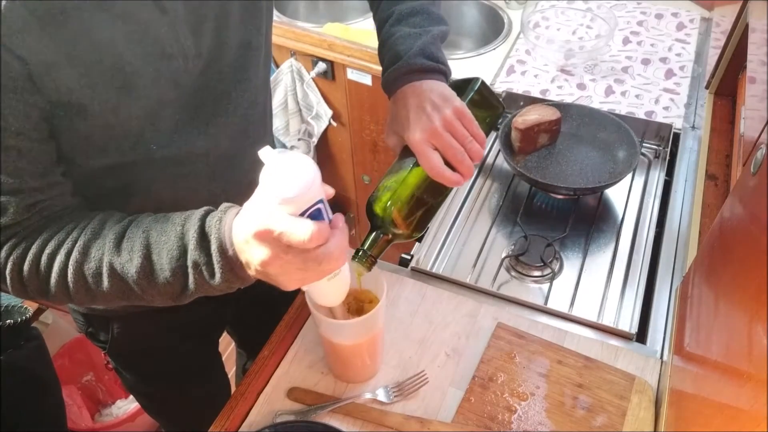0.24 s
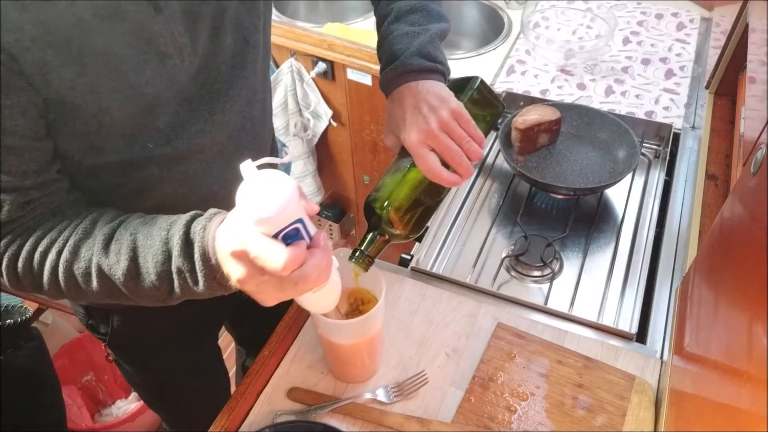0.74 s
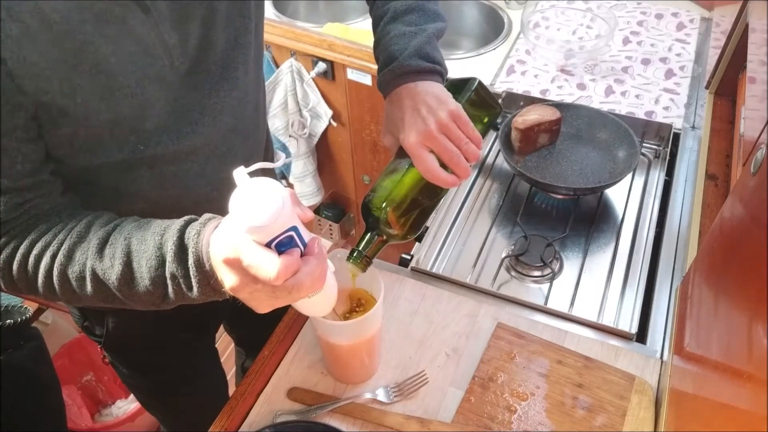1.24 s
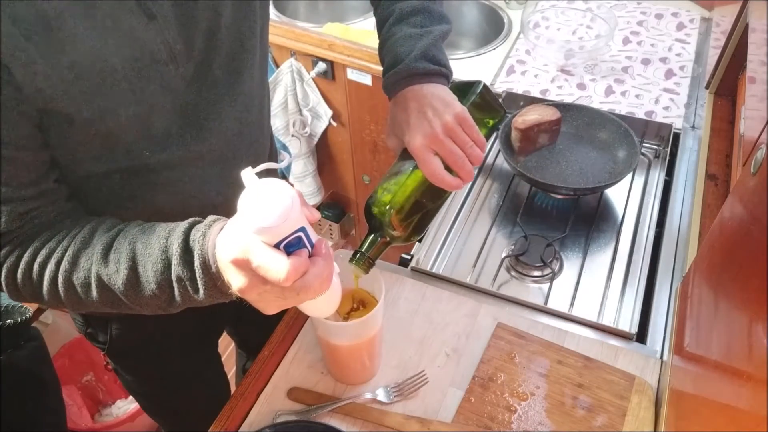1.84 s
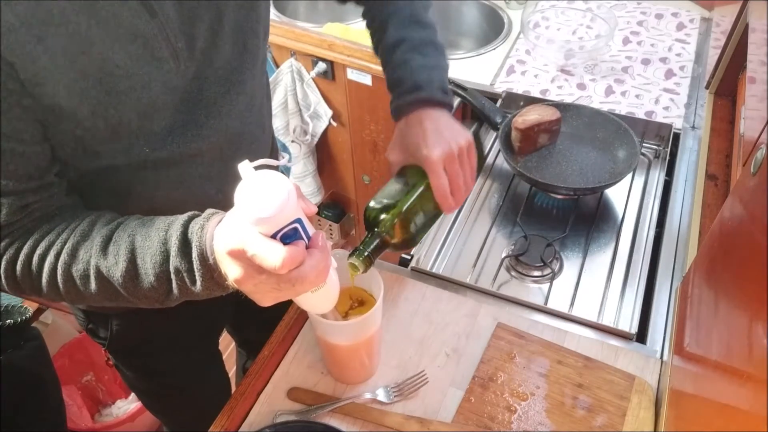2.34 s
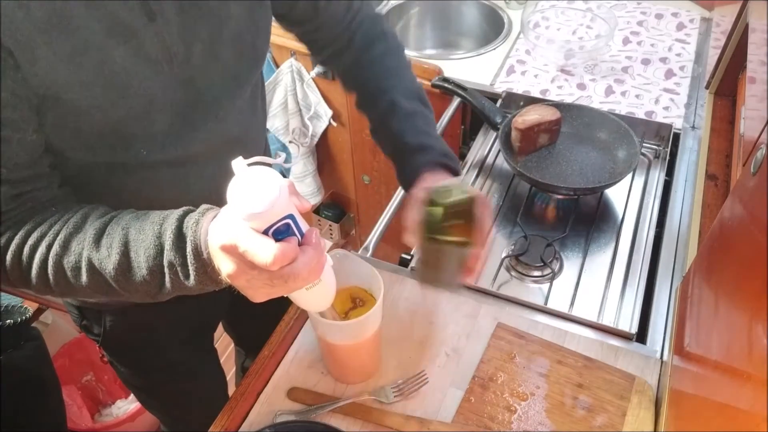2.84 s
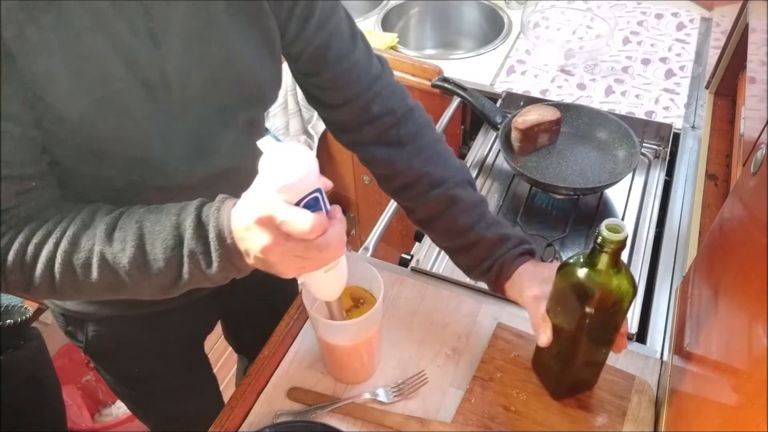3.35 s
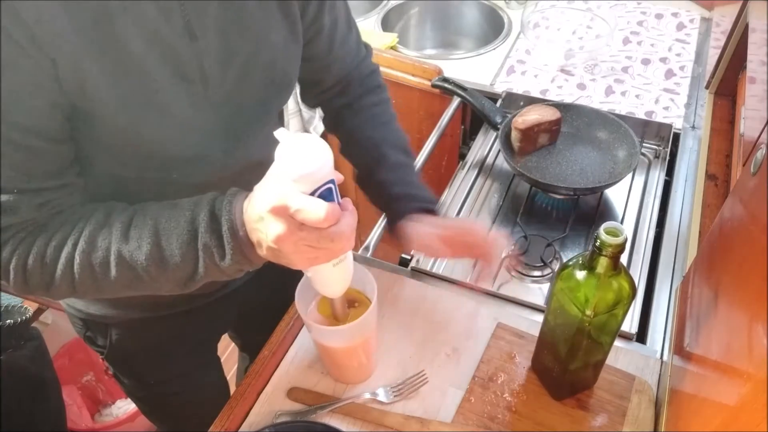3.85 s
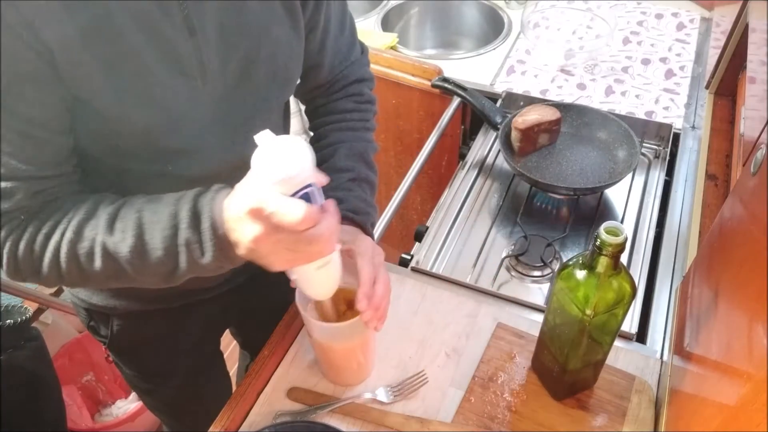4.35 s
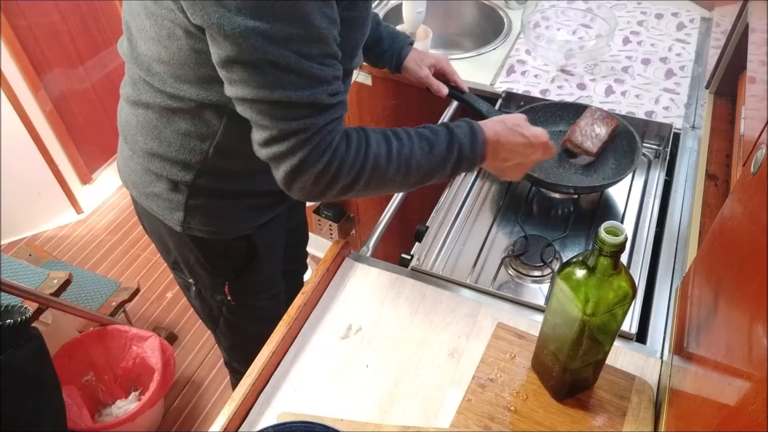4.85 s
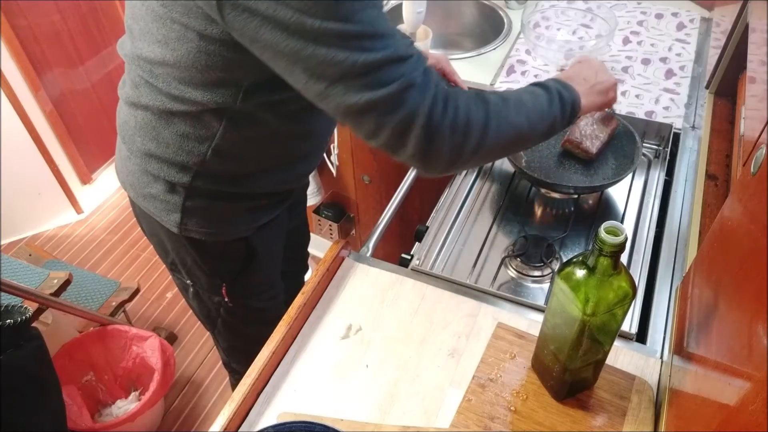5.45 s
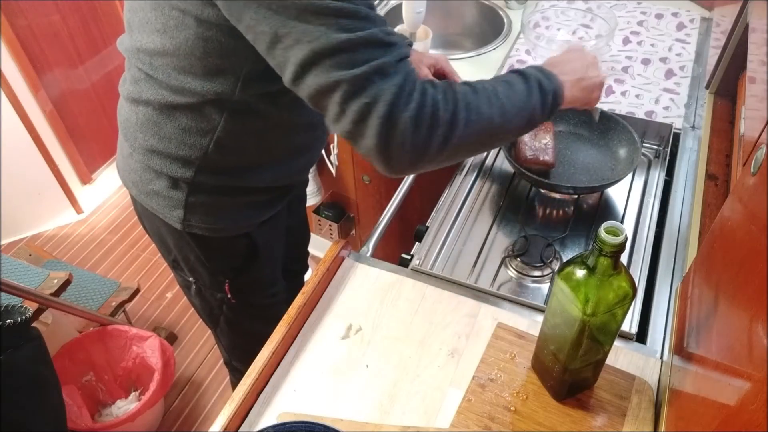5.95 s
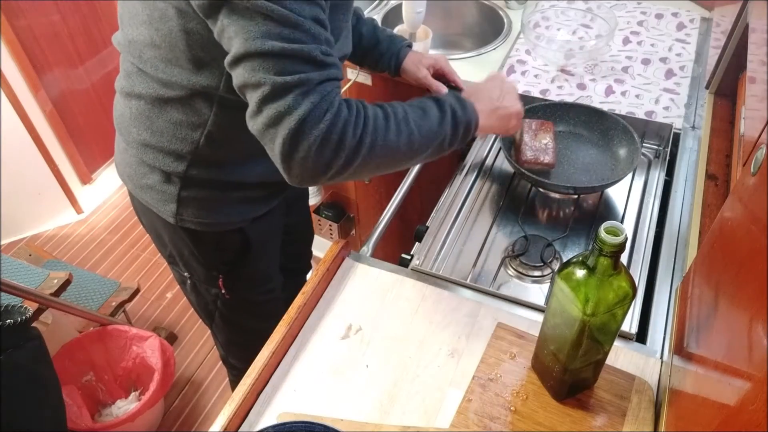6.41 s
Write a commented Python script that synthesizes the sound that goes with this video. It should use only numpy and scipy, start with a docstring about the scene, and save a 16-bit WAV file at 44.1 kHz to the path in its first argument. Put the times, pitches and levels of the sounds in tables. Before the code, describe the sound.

A fish steak sizzles and pops over a gas ring throughout. Close to the microphone, a hand blender runs twice in a beaker of sauce, buzzing and rattling, gulping air the second time. Between the bursts a glass bottle lands on wood with a dull knock. The motor suddenly cuts out, leaving louder, surging frying and a low flame rumble. The cramped galley adds short reflections.

```python
"""A stick blender runs in bursts in a plastic beaker of sauce, close to a stereo microphone in a small
boat galley. The motor hums, the shaft rattles the beaker, and the blade churns, splatters and gulps air.
Between bursts an oil bottle is set down on a board. A fish steak fries over a gas ring throughout, steam
bubbles bursting and fat spitting. Abruptly the blender's sound vanishes and sizzle, flame and draught
jump louder; the steak flares up as it is pushed about and turned. Close walls give short reflections."""
import sys
import numpy as np
from scipy import signal
from scipy.fft import rfft, irfft
from scipy.io import wavfile

SR = 44100
rng = np.random.default_rng(int(sys.argv[2]) if len(sys.argv) > 2 else 0)


def dump(signal):
    """Clip the signal to [-1, 1] and save it as 16-bit WAV at the path in sys.argv[1]."""
    limited = np.clip(np.atleast_2d(signal).T, -1, 1)
    pcm = np.round(limited * 32767).astype(np.int16)
    wavfile.write(sys.argv[1], SR, pcm)


N = 294588
TIME, BINS = np.arange(N) / SR, np.fft.rfftfreq(N, 1 / SR)
JUMP_S = 4.818  # the blender's sound vanishes; sizzle, flame and draught jump louder
PAN_LAG = 50  # samples by which the pan reaches the microphone's left side later

# The blender's phase at the microphone. Each row: frequency in Hz, radians by which the left leads.
BLENDER_LEAD = [(250, -.2), (450, -1.6), (650, -1), (760, -.5), (1040, -.2), (1087, 1.1), (1110, 2),
                (1200, 2), (1700, 2.8), (3000, 1.5), (8000, 1.5)]
# The pan's place in the stereo image. Each row: frequency in Hz, left minus right in dB.
PAN_BALANCE = [(500, -2), (2000, -1), (7000, -.7), (9000, 2), (11000, 4.5), (14000, 3.5), (16000, 1.5)]
# The bottle lands and the beaker bumps on the worktop. Each row: start in seconds, strength in dB.
BLOWS = [(2.963, -46), (3.3479, -7.5), (3.736, -19), (4.432, -22)]


def gain_of(db):
    """Decibels to amplitude."""
    return 10 ** (np.asarray(db) / 20)


def evened(x):
    """Scales to rms 1."""
    return x / np.sqrt(np.mean(x ** 2) + 1e-20)


def spectrum(points):
    """A spectrum table at every frequency bin."""
    hz, value = np.transpose(points)
    return np.interp(np.log(BINS + 1), np.log(hz + 1), value)


def curve(rows):
    """A time table at every sample."""
    return np.interp(TIME, *np.transpose(rows))


def shaped(x, response):
    """Filters by a frequency response."""
    return irfft(rfft(x) * response, N)


def band(hz, half_width_hz):
    """A flat-topped frequency response centred on hz."""
    return 1 / (1 + ((BINS - hz) / half_width_hz) ** 4)


def sides(points):
    """Left and right gains from a table of level differences."""
    return gain_of(np.array([[.5], [-.5]]) * spectrum(points))


def drift(hz):
    """A random wander of rms 1, up to the given rate."""
    return evened(shaped(rng.standard_normal(N), band(0, hz)))


def grains(per_s, spread_db):
    """Random clicks, most small and a few large."""
    size = gain_of(spread_db * np.minimum(rng.exponential(1, N), 5))
    return size * rng.choice([-1, 1], N) * (rng.random(N) < per_s / SR)


def add(mix, s, sound):
    """Mixes a sound in at s seconds."""
    part = mix[max(round(s * SR), 0):][:len(sound)]
    part += sound[:len(part)]


def swell(start, end, rise_s, fall_db_per_s):
    """An envelope that rises towards 1 from start and dies away after end."""
    return (1 - np.exp(-np.maximum(TIME - start, 0) / rise_s)) * gain_of(
        -fall_db_per_s * np.maximum(TIME - end, 0))


def bump(s, width_s):
    """A bell-shaped envelope that peaks at s seconds."""
    return np.exp(-((TIME - s) / width_s) ** 2)


def at_jump(before, after):
    """One value until JUMP_S, another from then on."""
    return np.where(TIME < JUMP_S, before, after)


def galley(x, wet_db, t60, lag=0, walls=0.66):
    """At the microphone: direct sound, echoes off close walls (a share of the wet power), a tail."""
    t = np.arange(SR // 4) / SR
    taps = rng.standard_normal((2, len(t))) * gain_of(-60 * t / 0.092)
    taps /= np.linalg.norm(taps, axis=1, keepdims=True)
    echoes = signal.oaconvolve(x[None], taps, axes=1)[:, :N]
    decay = np.exp(-2 * np.log(1000) / (t60 * SR))
    tail_power = signal.lfilter([0, 1 - decay], [1, -decay], x ** 2 + 1e-20)
    tail = np.sqrt(tail_power) * rng.standard_normal((2, N))
    room = np.sqrt(walls) * echoes + np.sqrt(1 - walls) * tail
    return np.array([np.roll(x, lag), x]) + gain_of(wet_db) * room


def from_beaker(pair, response):
    """Colours two signals and blends them as the microphone's two sides hear the blender."""
    # Each row: frequency in Hz, coherence of left and right from 0 to 1.
    coherence = [(100, .95), (250, .95), (380, .25), (600, .4), (950, .78), (1300, .72), (1600, .3),
                 (4000, .25), (16000, .1)]
    # Each row: frequency in Hz, left minus right in dB.
    balance = [(100, 1.5), (250, -1), (370, -3), (550, -4), (760, 7.5), (1030, -8), (1300, 1.5),
               (2000, -0.5), (7000, -0.5), (12000, 7.5)]
    left, other = rfft(pair) * response
    same = spectrum(coherence)
    right = (same * left + np.sqrt(1 - same ** 2) * other) * np.exp(-1j * spectrum(BLENDER_LEAD))
    return evened(irfft(np.array([left, right]) * sides(balance), N))


def drive(air):
    """Shaft speed in Hz and gains of hum, rattle, churn and whine, from the button and air in the blade."""
    # Button presses, the first already running down. Each row: start, end, rise and hum's rise in
    # seconds, then relative levels of hum, rattle and churn in dB.
    bursts = [(-1, -.1, .03, .1, -38, -21, -22), (.438, 2.3, .035, .25, -27.3, -19, -22.2),
              (3.42, 4.9, .095, .12, -33, -22.6, -24.5)]
    # The shaft under load, once up to speed. Each row: time in seconds, speed in Hz.
    loaded_speed = [(.55, 181), (.7, 181.7), (.87, 179.8), (1.0, 181), (1.3, 181.4), (1.5, 181),
                    (1.9, 181.6), (2.3, 180.7), (3.55, 181.5), (3.75, 184.4), (4.0, 184), (4.4, 185),
                    (4.5, 181), (4.63, 180.3), (4.72, 177.7), (4.82, 176.7)]
    # The blade guard presses on the beaker. Each row: time in seconds, extra rattle in dB.
    scrapes = [(.56, 1), (.7, 3.5), (1.008, 5), (1.375, 5), (1.73, 3), (3.75, -1), (4.2, -1), (4.46, 5.5),
               (4.502, 5), (4.555, 3)]
    spin_up_s, coast_hz_per_s = .056, 70
    speed, hum, rattle, churn, whine = np.zeros((5, N))
    for down, up, rise, hum_rise, hum_db, rattle_db, churn_db in bursts:
        held, coasting = np.maximum(TIME - down, 0), np.maximum(TIME - up, 0)
        spin = curve(loaded_speed) * (1 - .25 * np.exp(-held / spin_up_s)) - coast_hz_per_s * coasting
        speed = np.where(TIME >= down, spin, speed)
        shudder = gain_of(-14) * bump(up + 0.14, width_s=0.037)  # once, as the motor coasts
        hum += gain_of(hum_db) * (swell(down, up, hum_rise, fall_db_per_s=400) + shudder)
        bite_db = 4.5 * np.exp(-held / 0.11)  # a harder rattle until the sauce is moving
        rattle += gain_of(rattle_db + bite_db) * swell(down, up, rise, fall_db_per_s=113)
        churn += gain_of(churn_db) * swell(down, up, rise, fall_db_per_s=94)
        whine += swell(down + 0.043, up, rise_s=0.03, fall_db_per_s=113)  # sings nearing full speed
    scrape_db = sum(db * bump(s, width_s=0.011) for s, db in scrapes)
    rattle *= gain_of(0.36 + 3.5 * air + scrape_db)
    churn *= gain_of(0.28 + 3 * air)
    return speed, hum, rattle, churn, whine


def motor_hum(turns, air):
    """The motor hums and its commutator whistles on multiples of the shaft speed."""
    # Orders 24 and 48 are the commutator. Each row: multiple of shaft speed, left and right relative
    # levels in dB, left lead in radians, change in dB per unit of air in the blade.
    orders = [(1, -4.7, -.7, -.3, 0), (2, -21, -7.5, 2.2, -4), (3, -18, -18, -1.4, 4),
              (4, -3, -12, -1.4, -5), (5, -14, -7, -.4, 0), (7, 2, 1, 2.3, 3), (14, -27, -24, 0, 16),
              (24, -9, -7, 2.9, 4), (48, -14, -24, -.4, -4)]
    # The once-a-turn hum swells as the blender is braced and sinks as it bogs down.
    # Each row: time in seconds, change in dB.
    bracing = [(.45, 4), (.7, 1.5), (.92, -7), (1.02, 0), (2.3, -0.5), (2.45, 7.5), (3.57, 3.5), (3.66, 12),
               (3.75, 9.5), (4.0, 5.5), (4.39, 8.5), (4.47, 2), (4.62, -5), (4.72, -1)]
    hum = 0
    for order, left_db, right_db, lead, air_db in orders:
        phase = 2 * np.pi * (order * turns + rng.random()) + .15 * drift(50)
        level_db = air_db * air + (order == 1) * curve(bracing) + (1.6 + .8 * air) * drift(23)
        hum = hum + gain_of([left_db + level_db, right_db + level_db]) * np.sin([phase, phase - lead])
    return np.sqrt(2) * gain_of(1.5) * hum


def shaft_whine(speed, turns, air):
    """The shaft sings at six times its speed, less steadily with air in the blade."""
    # Each row: time in seconds, left and right levels in dB.
    levels = [(0, -42, -42), (.48, -24, -14), (.58, -27, -22), (.72, -18.5, -19), (.95, -37, -25),
              (1.2, -35, -30), (2.3, -40, -32), (3.53, -25, -13.5), (3.66, -20.5, -33), (3.95, -25, -34),
              (4.38, -23, -19), (4.5, -33, -27), (4.56, -27, -27), (4.62, -25, -22), (4.8, -20.5, -21)]
    s, left_db, right_db = np.transpose(levels)
    gain = gain_of([np.interp(TIME, s, left_db), np.interp(TIME, s, right_db)])
    phase = 2 * np.pi * 6 * turns + .2 * drift(40)
    lead = np.interp(6 * speed, BINS, spectrum(BLENDER_LEAD))
    shake = 1 + (.3 + .3 * air) * drift(35)
    return np.sqrt(2) * np.sin([phase, phase - lead]) * shake * gain


def shaft_rattle(turns):
    """The shaft knocks once a turn into resonances that glide as the sauce swirls and the blade moves."""
    # Resonances of shaft and beaker. Each row: usual pitch in Hz, width in Hz, relative level in dB.
    modes = [(199, 11, 0.5), (275, 53, -12.5), (365.5, 16.6, -7.5), (502, 83, -8.5), (604, 53, -5),
             (756, 37, 0), (872, 60, 0.5), (1018.5, 37.4, 8), (1150, 100, 3), (1252, 111, 4.5),
             (1590, 125, -4.5)]
    # Each row: time in seconds, share of the usual pitch.
    tuning = [(.45, .93), (.56, 1), (2.3, 1), (3.45, .95), (3.54, 1), (3.72, 1.02), (4.15, 1.015),
              (4.27, .99), (4.36, .96), (4.42, .975), (4.49, 1)]
    knock = (0.15 + np.exp(-(turns % 1) / 0.69)) * gain_of(0.39 * drift(22))
    body = sum((-1) ** k * gain_of(db) / (1 + 1j * (BINS ** 2 - hz ** 2) / (width * BINS + 1))
               for k, (hz, width, db) in enumerate(modes))
    rattle = from_beaker(knock * rng.standard_normal((2, N)), body)
    place = np.cumsum(curve(tuning) + .007 * drift(8))  # reading faster or slower bends the pitch
    return np.array([np.interp(place % N, np.arange(N), side) for side in rattle])


def sauce(turns, churn_gain, air):
    """The blade tears the sauce into dense clicks, and slurps when it draws air."""
    # Churned sauce. Each row: frequency in Hz, relative density in dB.
    churn_colour = [(60, -10), (100, 0), (320, -6), (520, 5), (900, -12), (1350, 4.5), (1680, 6), (2000, 3),
                    (2650, 4.5), (3500, -0.5), (4450, -1), (5700, -5.5), (6700, -3), (10000, -10.5),
                    (16000, -23)]
    # Slurped air and sauce. Each row: frequency in Hz, relative density in dB.
    slurp_colour = [(300, -21), (520, -4), (750, -19), (1300, 4.5), (1670, 6.5), (1950, -1), (2650, 6.5),
                    (3600, -4.5), (4600, -0.5), (5700, -10.5), (6600, -1.5), (7600, -6), (8600, -5),
                    (11000, -9), (16000, -21)]
    # The air above the sauce rings. Each row: frequency in Hz, half-width in Hz, boost in dB.
    air_modes = [(1690, 50, 5.5), (2110, 40, 7), (2237, 25, 2), (2550, 65, -0.5), (4340, 60, 4.5),
                 (5000, 36, 9.5), (5460, 52, 10.5), (6040, 80, 7.5), (6320, 130, 4), (8550, 89, 3.5)]
    slosh = (1 + 0.046 * np.cos(2 * np.pi * turns)) * gain_of(drift(15))
    churn = galley(grains(per_s=5000, spread_db=3.0), wet_db=6, t60=0.039, walls=0.25)
    churn = from_beaker(slosh * churn, gain_of(spectrum(churn_colour)))
    hollow_db = sum(db / (1 + ((BINS - hz) / width) ** 2) for hz, width, db in air_modes)
    slurp = galley(grains(per_s=9000, spread_db=2.0), wet_db=12, t60=0.028, walls=0.35)
    slurp = from_beaker(slosh * slurp, gain_of(spectrum(slurp_colour) + hollow_db))
    return churn * churn_gain + slurp * gain_of(-15.5) * air


def blender():
    """One shaft drives hum, whine, rattle and sauce; air in the blade makes its speed wobble more."""
    # The blade rises and sucks in air. Each row: start and end in seconds, strength in dB.
    gulps = [(3.479, 4.416, 0), (4.449, 4.547, 2.5)]
    air = sum(gain_of(db) * swell(start, end, rise_s=0.063, fall_db_per_s=154)
              for start, end, db in gulps)
    speed, hum_gain, rattle_gain, churn_gain, whine_gain = drive(air)
    wobble = (.0012 + .005 * air) * drift(25)
    turns = np.cumsum(speed * (1 + wobble)) / SR
    beaker = shaft_rattle(turns) * rattle_gain + sauce(turns, churn_gain, air)
    motor = motor_hum(turns, air) * hum_gain + shaft_whine(speed, turns, air) * whine_gain
    return (motor + beaker) * at_jump(1, 0)


def fizz_gain():
    """The fizz holds a steady level and flares up when fresh juice meets the hot fat."""
    # Each row: time in seconds, level in dB.
    steady = [(0, -25.5), (1.3, -24.5), (1.9, -27.5), (2.7, -24.5), (3.25, -24.5), (3.45, -27.5),
              (3.7, -27.5), (4.3, -26), (4.45, -32), (4.72, -29.5), (5.1, -22.7), (5.55, -25.5),
              (6.4, -22.5), (6.68, -26.5)]
    # Each row: start, rise and decay in seconds, peak in dB.
    flares = [(.53, 0.024, 0.077, -22.5), (.72, 0.066, 0.27, -21), (2.16, 0.054, 0.023, -20.5),
              (3.0, 0.19, 0.096, -27.5), (4.812, 0.0086, 0.13, -17), (4.83, .045, 0.072, -19.5),
              (5.64, 0.081, 0.34, -20.5), (5.88, 0.12, 0.061, -22)]
    power = gain_of(curve(steady)) ** 2
    for s, rise, decay, db in flares:
        surge = np.clip((TIME - s) / rise, 0, 1) * np.exp(-np.maximum(TIME - s - rise, 0) / decay)
        power += (gain_of(db) * surge) ** 2
    return np.sqrt(power)


def frying():
    """Thousands of tiny steam bubbles burst each second, in clumps; the wet flesh gives coarser ones."""
    # Fine bubbles. Each row: frequency in Hz, relative density in dB.
    fizz_colour = [(200, -29), (650, -24), (1500, -16), (3000, -12), (5200, -8.5), (7000, -2), (8300, -1.5),
                   (10500, 0), (13000, -1.7), (15500, -2.7), (17000, -8)]
    # Coarse, wet bubbles. Each row: frequency in Hz, relative density in dB.
    wet_colour = [(200, -5.5), (650, -11.5), (1100, -10.5), (1350, -8), (1650, -2), (2100, 5), (2800, 4),
                  (3700, 1.5), (4500, 4), (5400, 5.5), (6500, 7), (8500, 4.5), (14000, -16)]
    # Each row: time in seconds, level of the wet frying in dB.
    wet_level = [(0, -25), (.2, -34), (.8, -29.5), (1.5, -39), (2.3, -34), (2.85, -36.5), (3.05, -31.5),
                 (3.4, -32), (5.6, -35.5), (5.88, -33.5), (5.94, -24.5), (6.2, -28.5), (6.68, -29)]
    # The sizzle sinks for a moment. Each row: time in seconds, dip in dB.
    lulls = [(.08, -5), (.325, -2), (.447, -2), (2.617, -10), (3.365, -3.5)]
    sputter_db = at_jump(1.0, .3)  # the sizzle sputters more evenly from JUMP_S on
    fine = grains(per_s=5500, spread_db=0.5) * gain_of(sputter_db * drift(37))
    coarse = grains(per_s=2600, spread_db=4.5) * gain_of(sputter_db * drift(26))
    fizz = galley(fine, wet_db=7, t60=.06, lag=PAN_LAG, walls=.55)
    wet = galley(coarse, wet_db=7, t60=.06, lag=PAN_LAG, walls=.6)
    fizz = evened(shaped(fizz, gain_of(spectrum(fizz_colour)) * sides(PAN_BALANCE)))
    wet = evened(shaped(wet, gain_of(spectrum(wet_colour)) * sides(PAN_BALANCE)))
    finest = shaped(fizz, 1 / (1 + (11000 / (BINS + 1)) ** 8))  # these come and go on their own
    fizz = (fizz - finest) * gain_of(.9 * drift(31)) + finest * gain_of(.9 * drift(60))
    lull_db = sum(db * bump(s, width_s=0.012) for s, db in lulls)
    return (fizz * fizz_gain() + wet * gain_of(curve(wet_level))) * gain_of(lull_db)


def pops():
    """Larger bubbles pop one by one while the steak lies still, each a dry, pitched tick."""
    out, t = np.zeros(N), np.arange(SR // 100) / SR
    pitches, decay_cycles = np.geomspace(3000, 14000, 12), 1.5
    for hz in pitches:
        pop = hz ** .8 * np.sin(2 * np.pi * hz * t) * np.exp(-hz * t / decay_cycles)
        out += signal.oaconvolve(grains(per_s=110 / len(pitches), spread_db=2.8), pop)[:N]
    heard = galley(out, wet_db=-2, t60=.05, lag=PAN_LAG, walls=.4)
    low_cut = BINS ** 2 / (BINS ** 2 + 1800 ** 2)
    return evened(shaped(heard, sides(PAN_BALANCE) * low_cut)) * at_jump(gain_of(-35.5), 0)


def gas_ring():
    """The soft roar of a fluttering flame and a deep draught, both abruptly louder at JUMP_S."""
    # Each row: frequency in Hz, relative density in dB.
    flame_colour = [(10, -14), (30, -16), (70, -5), (115, 4.5), (165, -3.5), (210, 7), (320, -17.5),
                    (450, -8), (650, -33), (850, -8), (1050, -18), (2000, -40)]
    # Each row: frequency in Hz, relative density in dB.
    draught_colour = [(1.5, -10), (3, 0), (6, -2), (12, -9), (25, -17), (50, -23), (120, -38), (400, -75)]
    mid, side, air = rng.standard_normal((3, N))
    pair = np.array([mid + 0.07 * side, mid - 0.43 * side])
    flame = evened(shaped(pair, gain_of(spectrum(flame_colour))))
    draught = evened(shaped(air, gain_of(spectrum(draught_colour))))
    flutter_db = 2 * drift(7.6)
    return flame * gain_of(at_jump(-50, -44) + flutter_db) + draught * gain_of(at_jump(-46.5, -33.5))


def spits_and_splatter():
    """Sharp snaps with a short spray and ring: fat spits in the pan, sauce splatters in the blender."""
    # The splatter is at 4.11-4.62 s. Each row: start in seconds, relative level in dB, ring in Hz.
    snaps = [(0.0408, -4, 6890), (0.1185, -9, 11800), (0.2374, -9, 10100), (0.279, -10, 8310),
             (0.3513, -7, 7100), (0.4, -11, 7700), (0.419, -12, 12500), (0.4954, -15, 6940),
             (0.5516, -10, 10500), (0.5954, -12, 2720), (1.1224, -10, 4410), (1.1444, -12, 2670),
             (1.2135, -6.5, 7240), (1.2824, -11, 5910), (1.54, -6, 7200), (1.6794, -8.5, 7000),
             (2.1914, -9, 2760), (2.361, -8, 7610), (2.3989, -11, 7620), (2.4643, -9.5, 11000),
             (2.5207, -7, 11600), (2.571, -12, 11400), (2.6304, -15, 7300), (2.6584, -9, 9820),
             (2.7053, -11.5, 10600), (2.7521, -10, 12400), (2.8569, -15, 12500), (2.8953, -6, 6400),
             (3.042, -6, 8900), (3.0758, -12, 8380), (3.1353, -17, 6900), (3.1614, -12, 11100),
             (3.1794, -9, 13000), (3.2131, -12, 9180), (3.2383, -7, 6850), (3.2715, -11, 7690),
             (3.2867, -6, 9030), (3.3378, -4.5, 7670), (4.1106, -5, 2500), (4.1504, -4, 2540),
             (4.5441, -6, 2840), (4.6207, -11, 2780), (6.3939, -10, 10000), (6.5087, -8, 9960)]
    # Each row: frequency in Hz, gain in dB.
    colour = [(200, -39), (1500, -35), (3000, -46), (4500, -8.5), (7000, 2), (10500, 0.5), (15500, -7)]
    out, t = np.zeros(N), np.arange(SR // 15) / SR
    snap = 1.1 * np.exp(-t / .0004) + .28 * np.exp(-t / .003)
    spray = 0.028 * np.exp(-t / 0.011)
    for s, db, hz in snaps:
        ring = 0.49 * np.sin(2 * np.pi * hz * t) * np.exp(-t / 0.00098)
        add(out, s, gain_of(db - 1) * (rng.choice([-1, 1], len(t)) * (snap + spray) + ring))
    heard = galley(out, wet_db=-3, t60=.05, lag=PAN_LAG, walls=.3)
    return shaped(heard, gain_of(spectrum(colour)) * sides(PAN_BALANCE))


def worktop():
    """A blow gives a dull crack, the modes of the board, and a short boom in the cupboard below."""
    # Board and worktop. Each row: frequency in Hz, relative level in dB, seconds to fall 60 dB.
    modes = [(170, -16, .07), (208, 0.5, 0.18), (244, -2.5, 0.26), (286, -9, 0.093), (355, -12, 0.14),
             (376, -9.5, 0.23), (421, -7, 0.13), (461, -5.5, 0.14), (517, -14, 0.15), (759, -15, 0.16),
             (834, -21, .06), (920, -22, 0.22), (1055, -24, 0.091), (1630, -30, 0.041), (1970, -30, 0.043)]
    contact_s = 0.0011  # the heavy bottle presses into the wood
    wood, cracks, t = np.zeros(N), np.zeros(N), np.arange(SR // 2) / SR
    ring = -sum(gain_of(db - 60 * t / t60) * np.sin(2 * np.pi * hz * t) for hz, db, t60 in modes)
    for s, db in BLOWS:
        add(wood, s, gain_of(db) * ring * (1 - np.exp(-t / contact_s)))
        add(cracks, s, gain_of(db) * rng.standard_normal(len(t)) * np.exp(-t / 0.0023))
    dull = BINS ** 2 / (BINS ** 2 + 350 ** 2) / (1 + (BINS / 2250) ** 14)
    crack = shaped(galley(cracks, wet_db=0, t60=0.17, walls=0.3), dull)
    boom = shaped(galley(wood, wet_db=-3, t60=.11, walls=.08) - wood, band(330, 190))
    low_cut = signal.butter(2, 110, "highpass", fs=SR, output="sos")  # a small board has little bass
    return signal.sosfilt(low_cut, wood) + gain_of(7) * crack + boom


def cabinet():
    """The whole cabinet shudders on after each blow, a low rumble dying away."""
    t60 = 1.7
    fade = sum(gain_of(db) * swell(s, s, rise_s=.005, fall_db_per_s=60 / t60) for s, db in BLOWS)
    return gain_of(-26.5) * fade * evened(shaped(rng.standard_normal(N), band(66, 40)))


def button():
    """A short plastic click as the button goes down for the last burst."""
    out, t = np.zeros(N), np.arange(SR // 50) / SR
    add(out, 3.431, gain_of(-15) * rng.standard_normal(len(t)) * np.exp(-t / 0.0027))
    return shaped(galley(out, wet_db=9.5, t60=0.046), band(2600, 900))


def pan_rubs():
    """The pan hums briefly as it is shifted on its support."""
    # Each row: start in seconds, pitch in Hz, length in seconds, relative level in dB.
    shifts = [(4.942, 453, 0.14, -49.5), (5.44, 826, 0.12, -50), (5.449, 450, 0.05, -47),
              (5.559, 455, 0.18, -50.5), (5.65, 757, 0.13, -51.5), (6.297, 204, 0.12, -57)]
    out = np.zeros(N)
    for s, hz, length, db in shifts:
        t = np.arange(int(length * SR)) / SR
        slip = rng.standard_normal(len(t)).cumsum() / np.sqrt(SR)  # uneven slipping smears the note
        add(out, s, gain_of(db) * np.hanning(len(t)) * np.sin(2 * np.pi * hz * t + 20 * slip))
    return out * (1.8 + .5 * drift(40))


def scene():
    """The galley from the microphone's position."""
    return (blender() + frying() + pops() + gas_ring() + spits_and_splatter()
            + worktop() + cabinet() + button() + pan_rubs())


def record(dry):
    """The microphone's signal clips at full scale and is cut off above 16 kHz."""
    high_cut = signal.firwin(401, 16000, window=("kaiser", 9), fs=SR)
    return signal.oaconvolve(np.clip(dry, -1, 1), high_cut[None], "same")


dry = scene()
out = record(dry)
dump(out)
```